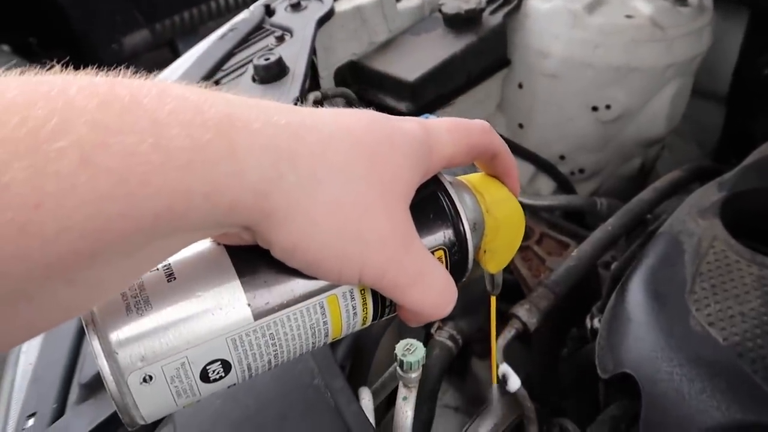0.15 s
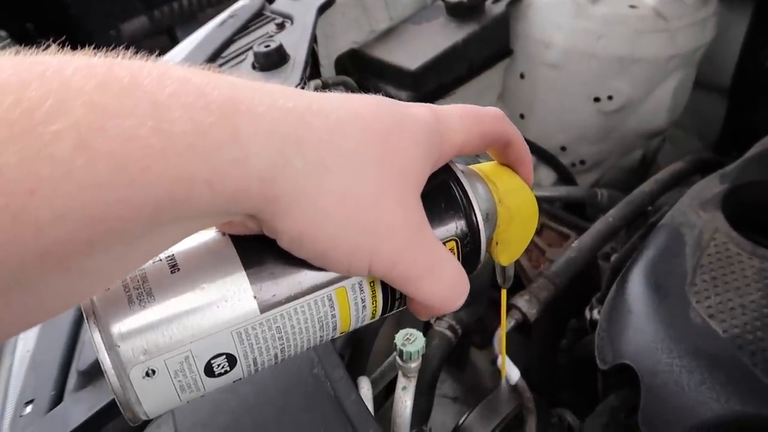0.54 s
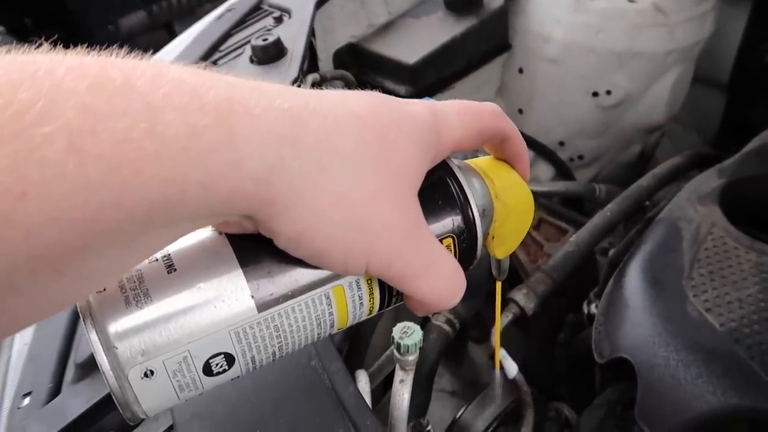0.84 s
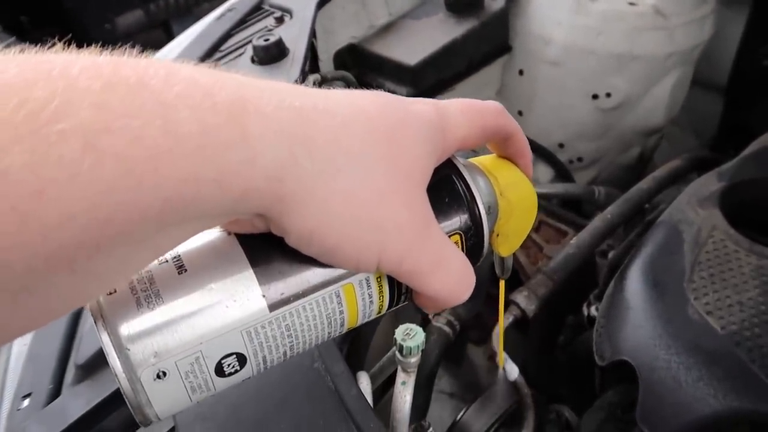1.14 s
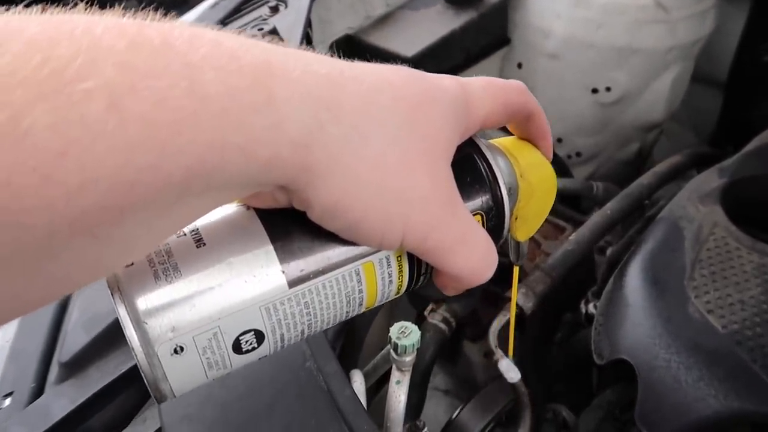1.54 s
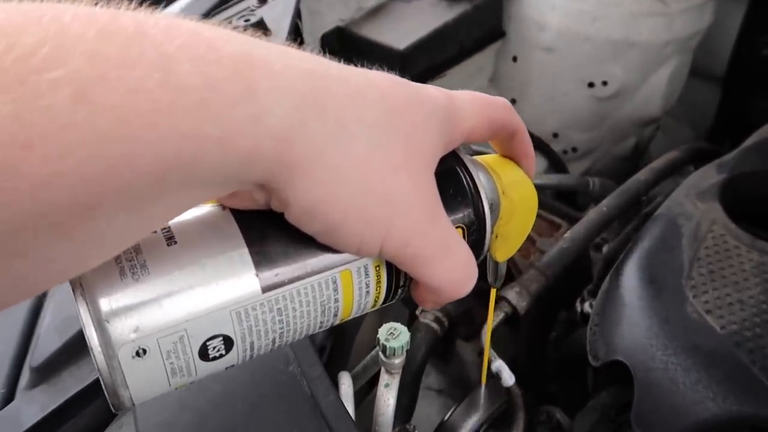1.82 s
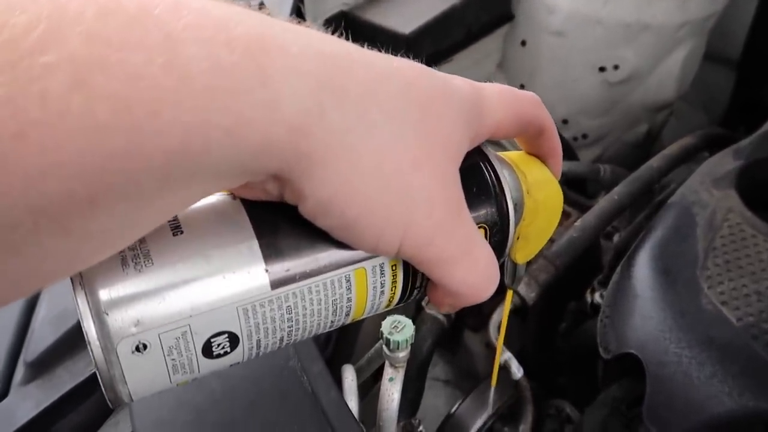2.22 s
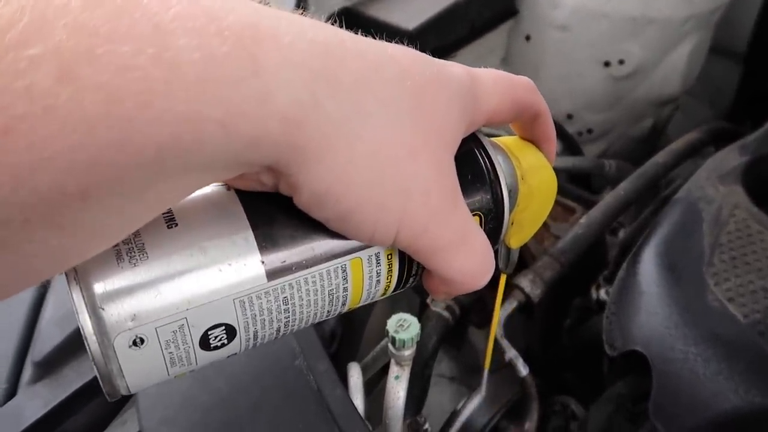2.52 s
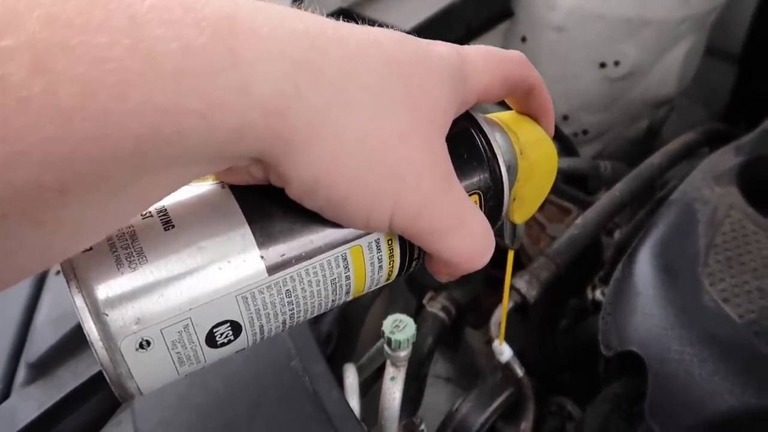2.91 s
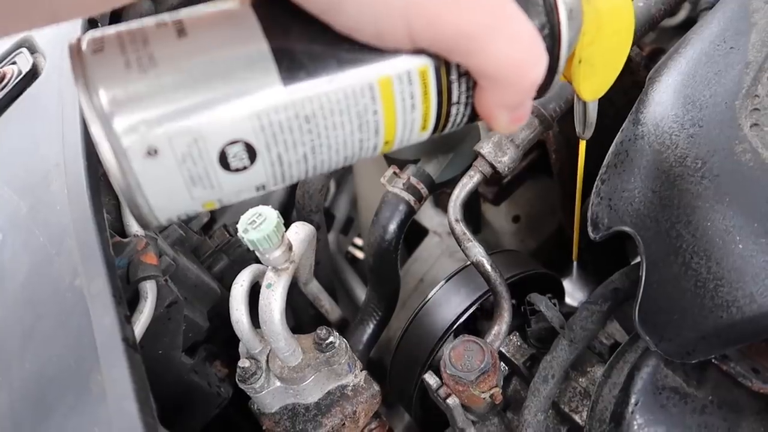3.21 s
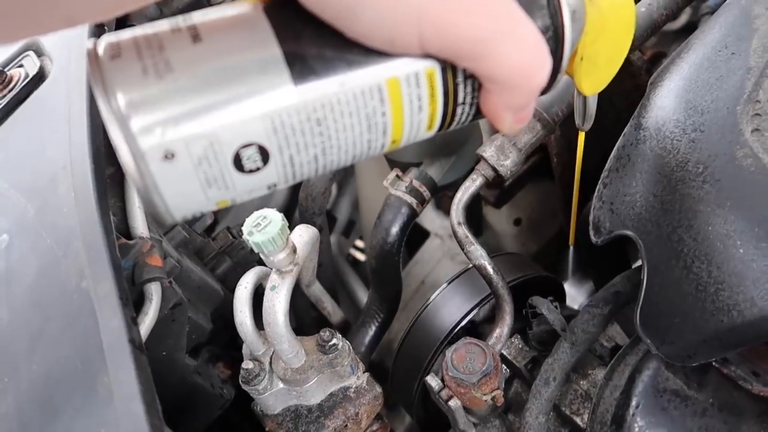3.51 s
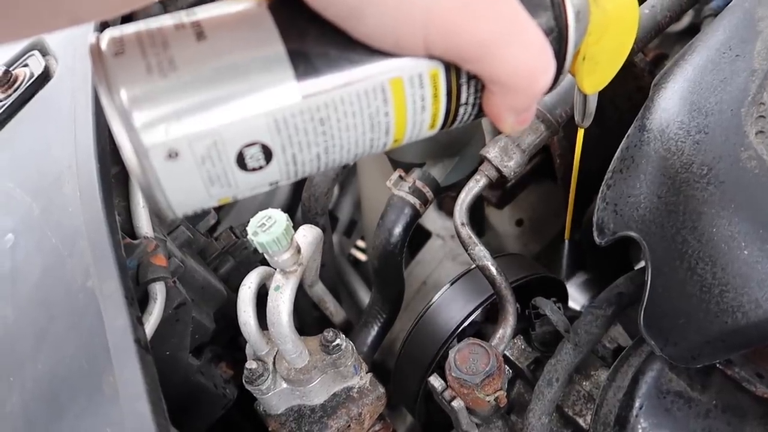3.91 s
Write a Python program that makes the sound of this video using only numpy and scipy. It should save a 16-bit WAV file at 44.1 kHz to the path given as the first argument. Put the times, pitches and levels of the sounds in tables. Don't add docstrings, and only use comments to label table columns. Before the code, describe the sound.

A close stereo pickup in an open engine bay, dominated throughout by the harsh squeal of a slipping drive belt. Two clashing high pitches, near 5 and 6 kHz, flutter in quick pulses, two per crank turn, roughly 25 a second, with a gritty buzzing beat beneath and thinner shrill tones around them. The squeal is weaker at 0 s, grows by 1 s and throbs on with brief uneven jumps and scuffs, about four a second. A fine aerosol hiss runs alongside, faint at first, fuller from 0.9 s, dipping near 2.8 s and strongest around 3.2 s before fading. From about 3 s the wet belt sounds lower, noisier and wobbly; after 3.65 s its pitch lurches and the upper tone drops in and out. Underneath are idling block rumble, dry valve clatter and fan hum, louder from 0.9 s and again near 3.2 s, plus low wind thumps around 0.7, 0.95 and 3.9 s. It stops at about 4 s, still squealing.

```python
import sys
import numpy as np
from scipy import signal
from scipy.fft import rfft, irfft, next_fast_len
from scipy.io import wavfile
from scipy.ndimage import uniform_filter1d, map_coordinates

SR = 44100
rng = np.random.default_rng(int(sys.argv[2]) if len(sys.argv) > 2 else 0)


def amplitude_ratio(level_db):
    exponent = np.asarray(level_db, float) / 20
    return 10 ** exponent


def log_audio(samples):
    frames = np.atleast_2d(samples).T
    limited = np.clip(frames, -1, 1)
    pcm = np.round(limited * 32767).astype(np.int16)
    wavfile.write(sys.argv[1], SR, pcm)


N = 178649


def unit(x):
    return x / np.sqrt(np.mean(np.abs(x) ** 2) + 1e-20)


def along(points, hz):
    point_hz, value = np.transpose(points)
    return np.interp(np.log(hz + 1), np.log(point_hz + 1), value)


def curves(rows):
    start_s, *columns = np.transpose(rows)
    return [np.interp(np.arange(N) / SR, start_s, column) for column in columns]


def wobble(rate_hz):
    return map_coordinates(rng.standard_normal(4000), [np.arange(N) * rate_hz / SR])


def bumps(times_s, sizes, rise_s, fall_s):
    t = np.arange(-SR // 10, SR // 10) / SR
    marks = np.bincount(np.round(times_s * SR).astype(int), sizes, N)[:N]
    bell = np.exp(-(t / np.where(t < 0, rise_s, fall_s)) ** 2)
    return signal.fftconvolve(marks, bell, "same")


def filtered(x, response):
    size = next_fast_len(N + SR // 4)
    return irfft(rfft(x, size) * response(np.fft.rfftfreq(size, 1 / SR)), size)[..., :N]


def rough(phase, share, rate_hz):
    in_phase = (1 + share * wobble(rate_hz)) * np.sin(phase)
    quadrature = share * wobble(rate_hz) * np.cos(phase)
    return (in_phase + quadrature) / np.sqrt(1 + 2 * share ** 2)


# hz, likeness [0-1]
PORT_LIKENESS = [(60, .95), (140, 1), (310, 0.96), (1000, 1), (2500, 0.86), (4000, 0.28), (8000, 0.39),
                 (13000, 0.4)]


def rush(spectrum, patchy_db, alike=PORT_LIKENESS):
    z = signal.stft(rng.standard_normal((2, N)), nperseg=512)[2]
    patches = uniform_filter1d(rng.standard_normal(z.shape[1:]), size=5, axis=0)
    patches = uniform_filter1d(patches, size=6, axis=1)
    pair = signal.istft(z * amplitude_ratio(patchy_db * unit(patches)), nperseg=512)[1][:, :N]

    def mid_side(hz):
        angle = np.arccos(np.clip(along(alike, hz), -1, 1)) / 2
        return amplitude_ratio(along(spectrum, hz)) * [np.cos(angle), np.sin(angle)]

    mid, side = filtered(pair, mid_side)
    return unit(np.array([mid + side, mid - side]))


# first_grip_s, turn_s, count_turns
CRANK_RUNS = [
    (-.0145, .07755, 40),
    (3.078, .079, 13),
]
# start_s, low_db, high_db, second_slip_high_gain_db, grip_dip_db
BELT_STATE = [(0, -35, -26, 3, -5), (.25, -32, -24, -3, -3.5), (.55, -25.5, -24, -1.5, -3),
              (.85, -32.5, -17.5, -1.5, -5.5), (1.0, -27.5, -14, -3, -3.5), (1.3, -26, -17.5, -3.5, -6),
              (1.5, -26.5, -14.5, -4.5, -5), (1.75, -28, -15, -2, -4), (2.0, -24, -16.5, -5.5, -4),
              (2.3, -23.5, -19.5, -3, -2.5), (2.6, -23.5, -18.5, -6, -3.5), (2.98, -20.5, -22.5, -3, -3),
              (3.08, -24.5, -19, -1, -8), (3.3, -19.5, -20, -0.5, -7.5), (3.5, -24, -22, 5.5, -9),
              (3.66, -22, -21.5, 6.5, -7.5), (3.821, -19.5, -16.5, 3.5, -8.5), (4.05, -20, -19.5, 2, -4.5)]
# start_s, peak_db
WORN_LOCKS = [(.235, -33), (0.698, -26), (0.8662, -52), (0.9756, -24), (1.185, -43), (1.4023, -19),
              (1.485, -31), (1.6763, -24), (1.8605, -34), (1.94, -31), (2.166, -24), (2.38, -35),
              (2.632, -23), (3.1731, -33.5), (3.9893, -33)]
# start_s, low_gain_db, high_loss_db
LOW_TAKEOVERS = [(.038, 3.5, 2.5), (.102, 1.5, 1), (.178, -4, 0.5), (.323, 1.5, -1.5), (.417, -1.5, -2),
                 (.57, 2.5, 2), (.642, -1.5, -0.5), (.81, 9.5, 5), (1.113, -2.5, 2), (1.276, 4.5, 2),
                 (1.341, 3, 0), (1.419, 4.5, 1.5), (1.802, 8.5, 4), (1.967, 5, 6), (2.048, 5, 5),
                 (2.202, 4, 0), (2.416, 3.5, 0.5), (2.589, 1, -1), (2.731, -1, 1), (2.813, 0, 4.5),
                 (2.895, 2, -2.5), (3.117, -3, 1)]
# start_s, extra_dip_db
GRIP_SNAGS = [(.066, -2), (.681, -1), (1.156, -3), (1.306, -1.5), (1.614, -3), (2.001, 1.5), (2.238, -4.5),
              (2.779, -4), (2.848, -2), (3.233, 3)]
# start_s, low_hz, low_db, high_db, beat_hz
WET_SLIPS = [(3.014, 5105, -22.5, -22, 789), (3.043, 4816, -27, -24.5, 1270),
             (3.157, 5127, -22.5, -27.5, 1129), (3.208, 4790, -27, -19, 1149),
             (3.233, 4997, -16, -40, 1201), (3.261, 5090, -25.5, -21, 828.6),
             (3.703, 4970, -17.5, -32, 1135), (3.755, 5180, -20, -26, 1147), (3.787, 5110, -17.5, -40, 949),
             (3.82, 5090, -18, -17.5, 815), (3.865, 4736, -17.5, -58, 1015), (3.9, 5160, -20.5, -28, 1250),
             (3.946, 4855, -17.5, -56, 850), (3.991, 5190, -20, -29, 1155), (4.015, 4880, -17.5, -60, 830)]


def turns():
    grip_s = np.concatenate([first + turn * np.arange(count) for first, turn, count in CRANK_RUNS])
    luck = rng.standard_normal((2 * len(grip_s), 6))
    second_s = grip_s + 0.52 * np.gradient(grip_s)
    s = np.ravel([grip_s, second_s], "F") + 0.002 * luck[:, 0]
    second = np.arange(len(s)) % 2
    soaked = s > 3.2

    def nearest(times_s):
        return np.abs(s[:, None] - times_s).argmin(axis=0)

    state_s, *state = np.transpose(BELT_STATE)
    low_db, high_db, swap_db, dip_db = [np.interp(s, state_s, column) for column in state]
    scatter_hz, scatter_beat_hz, scatter_db = 20, 8, 0.8

    climb = second * np.where(soaked, 0.563, 1)
    low_hz = 5110 + 130.46 * climb - 95 * soaked + scatter_hz * luck[:, 1]
    high_hz = 5858 + 50.03 * climb + scatter_hz * luck[:, 2]
    low_db = low_db + second * (2 - 3.5 * soaked) + scatter_db * luck[:, 4]
    high_db = high_db + second * swap_db + scatter_db * luck[:, 5]

    worn_s, lap_s, recover_laps, worn_beat_hz = 0.215, 0.2415, 0.3, -42
    lap = (s + 0.02 - worn_s) / lap_s % 1
    worn_hz = worn_beat_hz * np.exp(-lap / recover_laps) * ~soaked
    beat_hz = 784.2 + 18 * climb + worn_hz + scatter_beat_hz * luck[:, 3]

    lock_s, lock_db = np.transpose(WORN_LOCKS)
    sag_db = np.bincount(np.searchsorted(s, lock_s) - 1, np.maximum(lock_db + 35, 0), len(s))
    low_hz = low_hz - 8 * sag_db
    high_hz = high_hz - 8 * sag_db
    beat_hz = beat_hz - 4 * sag_db

    takeover_s, gain_db, loss_db = np.transpose(LOW_TAKEOVERS)
    k = nearest(takeover_s)
    beat_hz[k] += 25
    s[k], high_hz[k] = takeover_s, (low_hz + beat_hz)[k]
    low_db[k] += gain_db
    high_db[k] -= loss_db

    k = nearest(np.array(WET_SLIPS)[:, 0])
    s[k], low_hz[k], low_db[k], high_db[k], beat_hz[k] = np.transpose(WET_SLIPS)
    high_hz[k] = (low_hz + beat_hz)[k]

    snag_s, extra_dip_db = np.transpose(GRIP_SNAGS)
    dip_db[nearest(snag_s)] += extra_dip_db
    return s[2::2], dip_db[2::2], np.transpose([s, low_hz, low_db, high_hz, high_db, beat_hz])


def slips(glide_hz, share, gap_db, dip_fall_s, dip_rise_s):
    grip_s, dip_db, rows = turns()
    t = np.arange(N) / SR
    now = np.clip(np.searchsorted(rows[:, 0], t) - 1, 0, None)
    ends_s = np.append(rows[1:, 0], N / SR)
    progress = (t - rows[now, 0]) / (ends_s - rows[:, 0])[now] - 0.5
    low_hz, low_db, high_hz, high_db, beat_hz = rows[now, 1:].T

    climb_hz = np.repeat(np.clip(rows[1::2, 3] - rows[::2, 3], 0, 250), 2)[now]
    rise_hz = (glide_hz + share * climb_hz) * progress
    locked = np.abs(low_hz + beat_hz - high_hz) < 75
    low_hz = np.where(locked, high_hz - beat_hz, low_hz)
    held = np.array([low_hz + rise_hz, low_db, high_hz + rise_hz, high_db, beat_hz, 1. - locked])

    deep_db = np.minimum(2.6 * (dip_db + 7.0), 0)
    grip_db = bumps(grip_s, 0.72 * dip_db, dip_fall_s, dip_rise_s)
    grip_db = grip_db + bumps(grip_s, deep_db, 0.0069, 0.0075)
    grip_db = grip_db + bumps(rows[1::2, 0], np.full(len(rows) // 2, gap_db), 0.012, 0.0044)

    held = uniform_filter1d(held, size=300, axis=1)
    alone = uniform_filter1d(1. * (held[1] > held[3] + 7), size=600)
    held[0] += alone * (uniform_filter1d(held[0], size=750) - held[0])
    return *held, grip_db


def bay(x):
    t = np.arange(SR // 10) / SR
    tail = rng.standard_normal((2, len(t))) * amplitude_ratio(-60 * t / 0.062) * (t > 0.0007)
    tail = np.diff(tail, n=2, axis=1)
    echoes = signal.fftconvolve(x[None], tail / np.linalg.norm(tail[0]), axes=1)[:, :N]
    return x + amplitude_ratio(0.5) * echoes


def rib_response(hz):
    total = 0
    for center_hz, width_hz, level_db in [(5120, 220, 4.5), (5840, 430, 6.0), (6740, 180, -10),
                                          (7470, 220, -12), (4030, 830, -12.5)]:
        damping = 1j * hz * width_hz
        total = total + amplitude_ratio(level_db) * damping / (center_hz ** 2 - hz ** 2 + damping)
    return total


# times_high, times_beat, level_db
MIX_TONES = [(0, 2.5, -20), (1, -2.5, -26), (1, -2, -17), (1, 1, -8.5), (1, 2.5, -10), (1, 3.5, -21),
             (2, -4, -26), (2, -2, -26.5), (2, -2, -25.5), (2, -1, -22.5), (2, 0, -24), (2, 1, -25.5)]
# start_s, extra_rub_db
RIB_FLOOD = [
    (2.99, 0),
    (3.02, 5),
    (3.3, 5),
    (3.35, 1),
    (4.05, -1),
]


def belt():
    low_hz, low_db, high_hz, high_db, beat_hz, free, grip_db = slips(
        glide_hz=30.0, share=0.21, gap_db=-1, dip_fall_s=0.01, dip_rise_s=0.01)
    shared_hz = 30 * wobble(150)
    low = 2 * np.pi * np.cumsum(low_hz + shared_hz + 22 * wobble(200)) / SR
    high = 2 * np.pi * np.cumsum(high_hz + shared_hz) / SR
    beat = 2 * np.pi * np.cumsum(beat_hz + 11 * wobble(120)) / SR
    low_db = low_db + 1.2 * grip_db + 2.14 * wobble(60)
    high_db = high_db + 2.38 * grip_db + 2.24 * wobble(55)
    drive_db = 0.42 * low_db + 0.51 * high_db + 0.54 * grip_db

    sound = amplitude_ratio(low_db + 4) * rough(low, 0.33, 260)
    sound = sound + amplitude_ratio(high_db + 3.5) * rough(high, 0.28, 240)
    sound = sound + free * amplitude_ratio(high_db - 3.5 + 1.35 * wobble(110)) * np.sin(high - beat)

    tight_db = 0.028 * np.clip(beat_hz - 780, -70, 70)
    wide_hz = np.clip(beat_hz - 900, 0, 300)
    for m, n, level_db in MIX_TONES:
        level_db = level_db + m * np.sign(n) * tight_db - 0.009 * m * abs(n) * wide_hz
        level_db = level_db + 1.25 * (drive_db + 21.5) - 18 + 1.87 * wobble(35)
        sound = sound + amplitude_ratio(level_db) * rough(round(m) * high + round(n) * beat, 0.48, 200)
    sound = sound + amplitude_ratio(low_db - 19) * rough(2 * low, 0.33, 200)

    dull_db = 0.071 * np.minimum(beat_hz - 790, 0)
    sound = sound + amplitude_ratio(drive_db - 10.0 + dull_db + 2.25 * wobble(35.02)) * rough(beat, 0.38, 150)

    lock_s, lock_db = np.transpose(WORN_LOCKS)
    lock_tone = np.sin(2 * beat) + 0.34 * np.sin(3 * beat) + 0.71 * np.sin(5 * beat)
    sound = sound + bumps(lock_s + 0.0043, amplitude_ratio(lock_db - 2.5), 0.0076, 0.014) * lock_tone

    load_db = drive_db - uniform_filter1d(drive_db, size=SR // 3)
    load_db = load_db + bumps(lock_s, amplitude_ratio(lock_db + 33), 0.008, 0.02)

    effort = np.sqrt(amplitude_ratio(2 * low_db) + amplitude_ratio(2 * high_db))
    noise = rng.standard_normal((2, N)) + 1.8 * rng.standard_normal(N)
    rubbing = unit(filtered(noise, rib_response))
    flood_db, = curves(RIB_FLOOD)
    return bay(sound) + amplitude_ratio(-9 + flood_db) * effort * rubbing, load_db


# start_s, hiss_db
SPRAY_LEVEL = [(0.0, -45.5), (0.27, -42.5), (0.91, -35.5), (1.96, -38.5), (2.18, -35), (2.83, -42),
               (3.16, -32), (3.7, -38), (3.85, -44), (4.05, -45)]
# hz, density_db
JET_SPECTRUM = [(5500, -21), (7200, 3.5), (8500, -5), (10500, -3.5), (12400, -4.5), (12900, -15),
                (15500, -19)]


def spray(load_db):
    hiss_db, = curves(SPRAY_LEVEL)
    sputter_db = 1.43 * wobble(60) + 0.88 * wobble(400)
    return amplitude_ratio(hiss_db + 4.0 + 0.49 * load_db + sputter_db) * rush(JET_SPECTRUM, patchy_db=2.5)


# start_s, block_db, clatter_db
ENGINE_LEVEL = [(0.0, -50, -45.5), (0.94, -41, -35.5), (1.17, -40.5, -36.5), (2.77, -41.5, -36.5),
                (3.01, -40, -35), (3.23, -35, -30.5), (3.48, -38.5, -34.5), (4.05, -37, -33.5)]
# hz, density_db
BLOCK_SPECTRUM = [(60, -41), (100, -5), (200, -15.5), (270, -0.5), (330, -2.5), (400, 0.5), (440, -6.5),
                  (500, -2), (630, -11.5), (900, -7.5), (1300, -29.5)]
# hz, density_db
CLATTER_SPECTRUM = [(500, -21.5), (900, -4.5), (1600, -0.5), (2200, -2), (2800, -6), (3300, -1.5),
                    (3900, -7), (5500, 1.5), (7000, -7), (9000, -14.5)]
# pitch_hz, over_block_db, tremble [0-1]
HUM_TONES = [(92.4, -4, 0.7), (264, -7, 0.16), (290.3, -8, 0.6), (469.6, -8, 0.17), (533.4, -11, 0.1)]


def engine(load_db):
    block_db, clatter_db = curves(ENGINE_LEVEL)
    t = np.arange(N) / SR
    crank_hz = 12.9
    throb = np.sin(2 * np.pi * crank_hz * t + 1.9)
    block = amplitude_ratio(block_db + 1.5 + 0.27 * throb + 1.1 * wobble(8.29)) * rush(BLOCK_SPECTRUM, patchy_db=1.5)
    hum = sum(amplitude_ratio(over_db) * rough(2 * np.pi * hz * t, tremble, 30) for hz, over_db, tremble in HUM_TONES)
    clatter_db = clatter_db + 6.0 + 0.11 * load_db + 0.95 * wobble(40)
    clatter = amplitude_ratio(clatter_db) * rush(CLATTER_SPECTRUM, patchy_db=2.0)
    return block + amplitude_ratio(block_db) * hum + clatter


# start_s, buffet_db
WIND_LEVEL = [(0.0, -52), (0.07, -54.5), (0.56, -42), (0.7, -31.5), (0.87, -46), (0.94, -31.5), (1.34, -42),
              (2.05, -48), (2.09, -41.5), (2.71, -49.5), (3.09, -38), (3.56, -41), (3.71, -37), (3.77, -52),
              (3.87, -31), (4.05, -44)]
# hz, density_db
BUFFET_SPECTRUM = [(12, -35), (20, -1.5), (92, 0.5), (188, -6.5), (236, -12), (260, -19), (340, -41),
                   (570, -120)]
# hz, likeness [0-1]
WIND_LIKENESS = [(25, .97), (60, 1), (140, 0.87), (250, 1)]


def air():
    buffet_db, = curves(WIND_LEVEL)
    lumps = amplitude_ratio(3.3 * wobble(28)) * rush(BUFFET_SPECTRUM, patchy_db=1.4, alike=WIND_LIKENESS)
    return amplitude_ratio(buffet_db + 0.5) * unit(lumps)


# hz, left_minus_right_db
PORT_LEAN = [(60, 2.5), (360, -1.5), (2160, -2), (13000, -0.5)]
# hz, left_lead_rad
PORT_LEAD = [(0, -0.5), (4480, 0.3), (6370, 1), (6630, -2), (7580, -1.55), (13200, -2.5)]


def scene():
    squeal, load_db = belt()
    mix = squeal + engine(load_db) + spray(load_db) + air()
    side = np.array([[1], [-1]])

    def ports(hz):
        return amplitude_ratio(side * along(PORT_LEAN, hz) / 2) * np.exp(0.42j * side * along(PORT_LEAD, hz))

    return filtered(mix, ports)


def top_cut(x):
    return signal.sosfilt(signal.butter(12, 15200, fs=SR, output="sos"), x)


def record(dry):
    rounded = dry / (1 + np.abs(dry / 0.68) ** 3.3) ** 0.3
    return top_cut(rounded)


dry = scene()
out = record(dry)
log_audio(out)
```